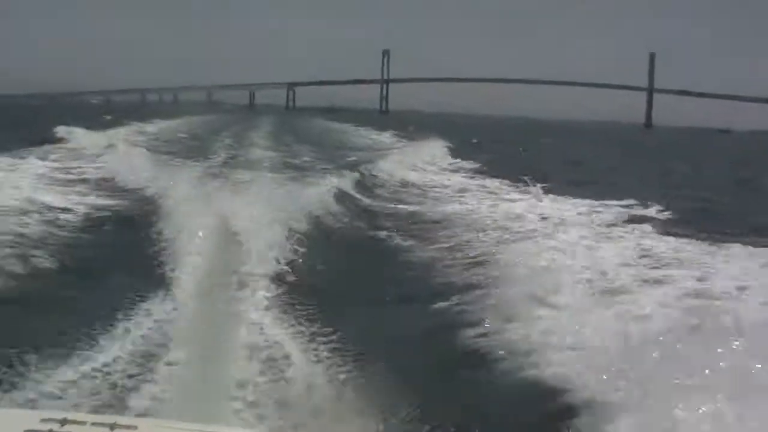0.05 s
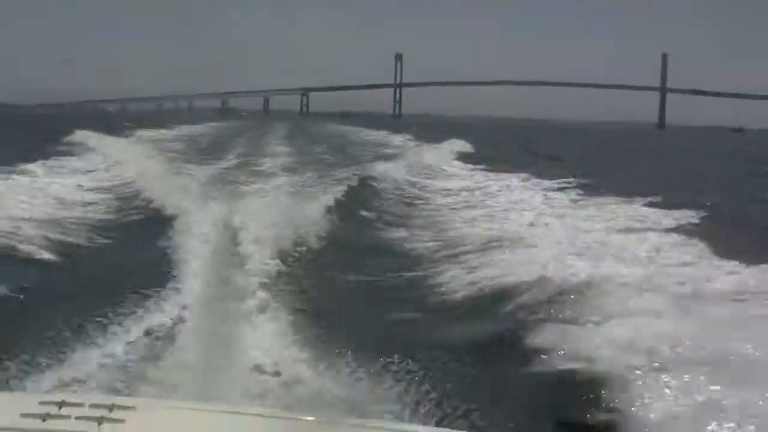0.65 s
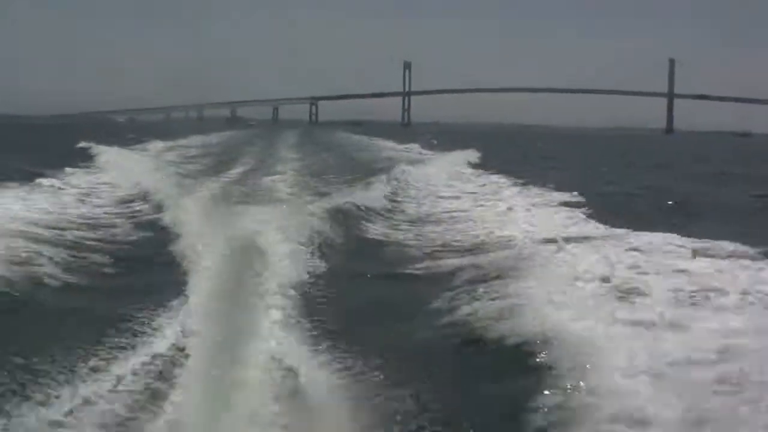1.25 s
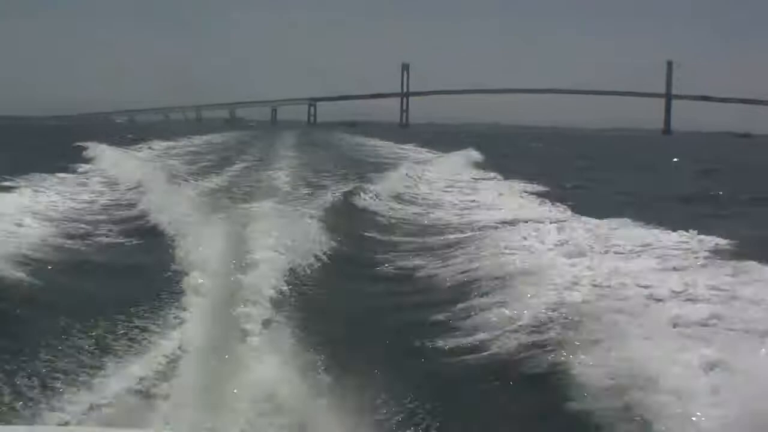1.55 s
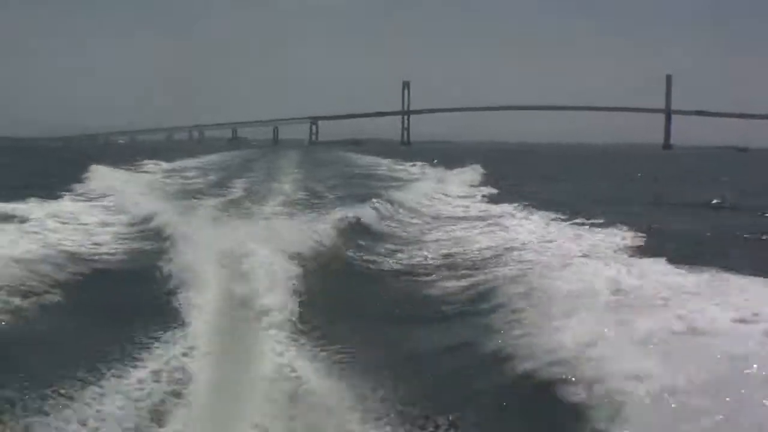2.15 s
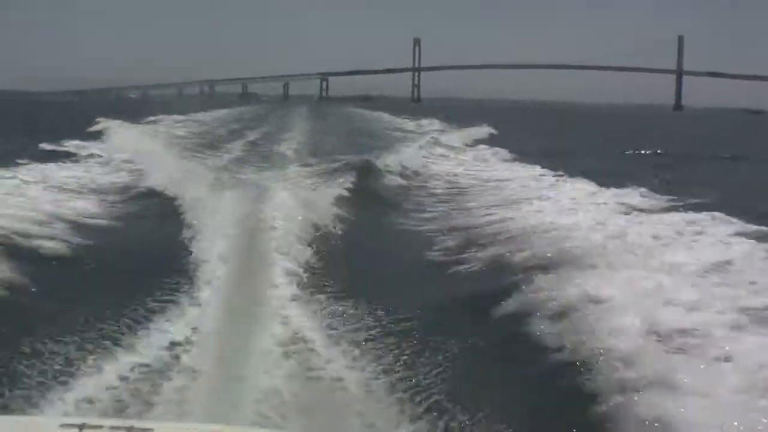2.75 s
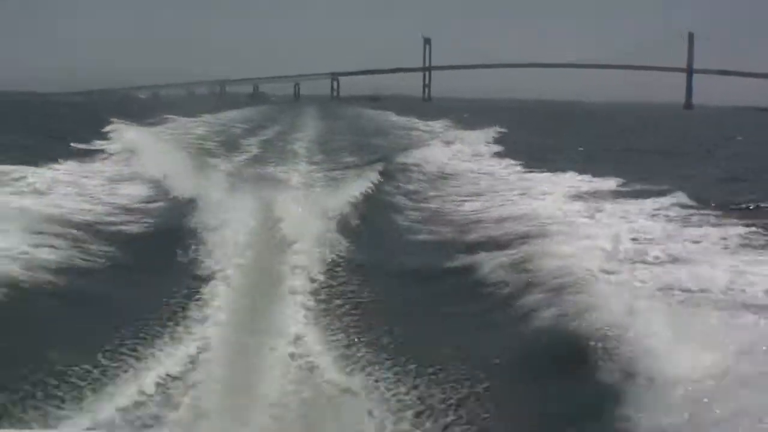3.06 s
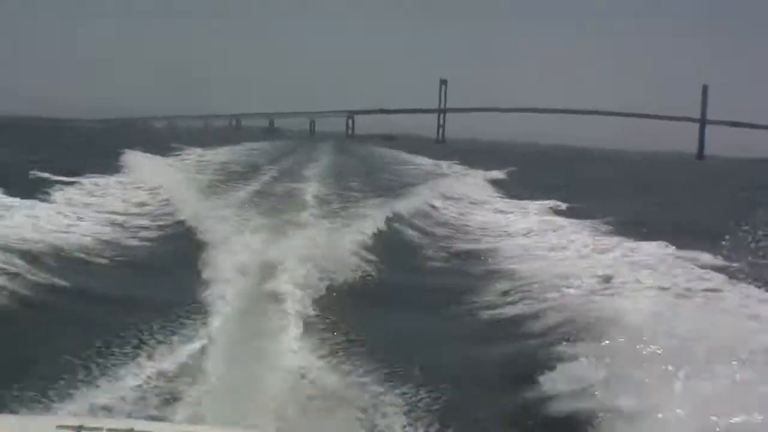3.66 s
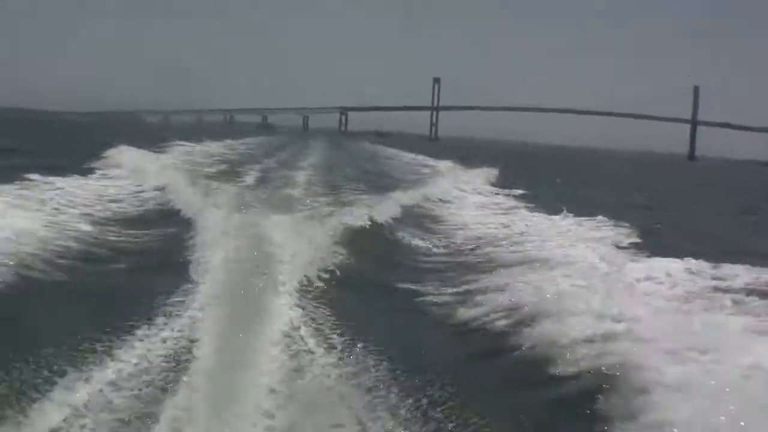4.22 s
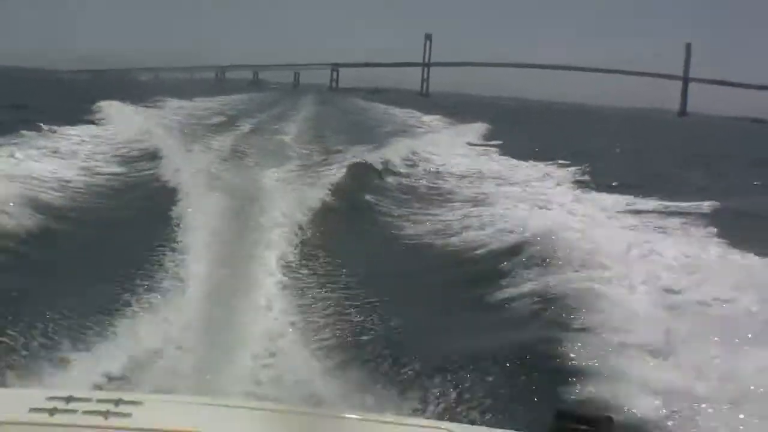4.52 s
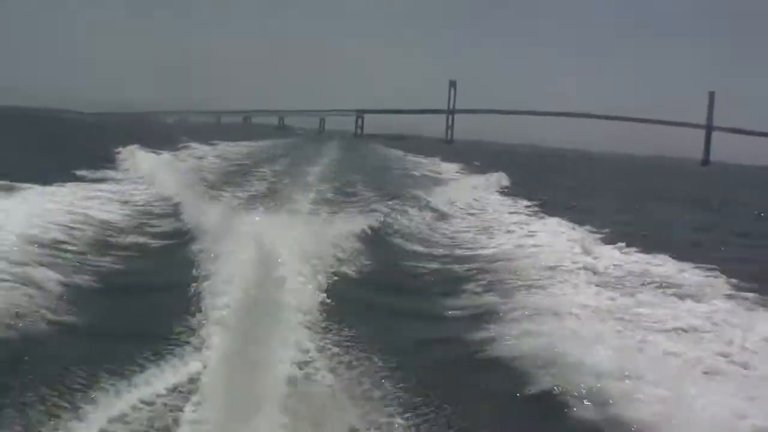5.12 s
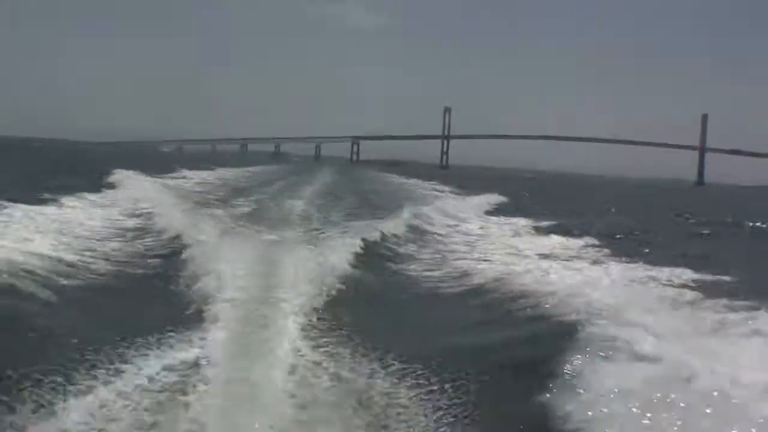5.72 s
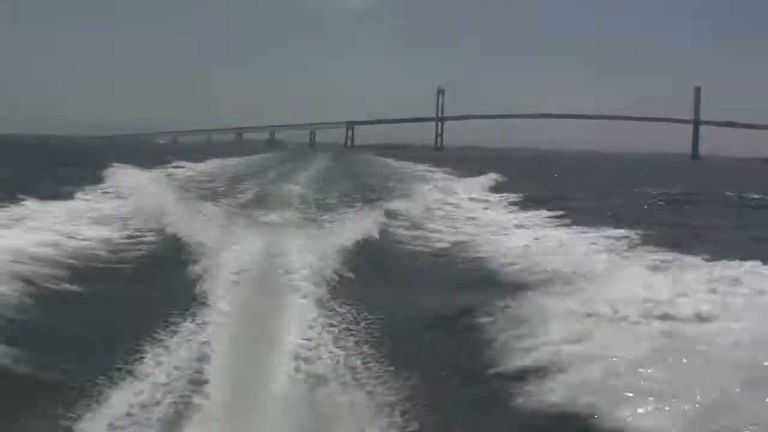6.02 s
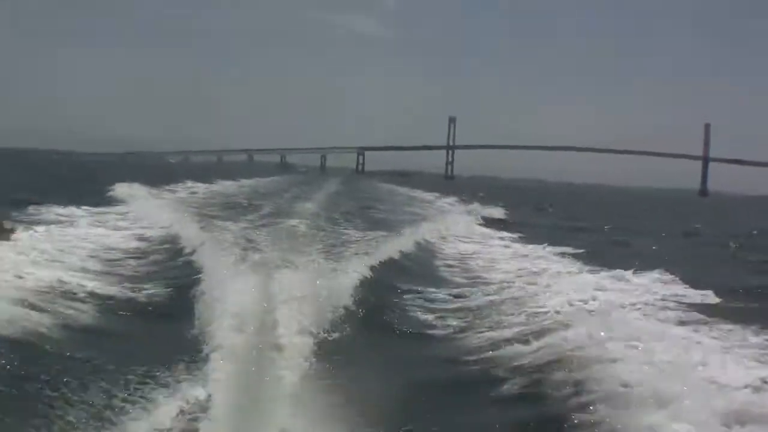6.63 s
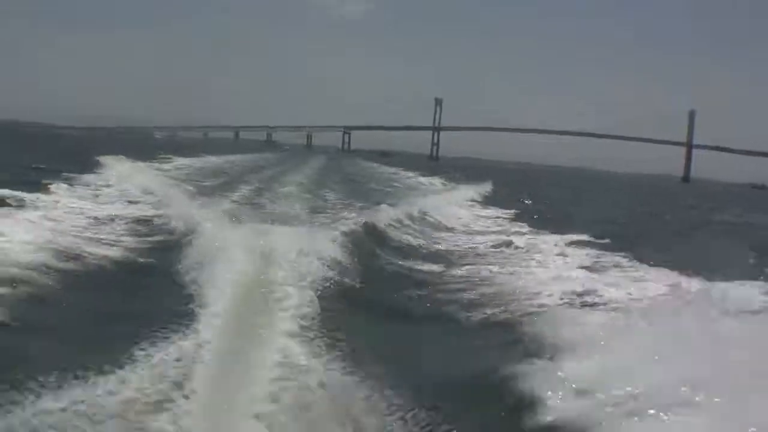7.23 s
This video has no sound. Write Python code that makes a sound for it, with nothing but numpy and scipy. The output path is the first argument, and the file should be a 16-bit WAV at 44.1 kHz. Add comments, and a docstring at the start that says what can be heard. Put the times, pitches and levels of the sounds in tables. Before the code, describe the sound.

Water rushes and sprays in surges behind a fast motorboat, its engines throbbing steadily as gusts bump the microphone.

```python
"""A twin-engine motorboat runs at speed over choppy water, heard from the stern.
From the start the two engines beat at slightly different speeds; exhaust booms and burbles through the
wake and the drives whine. About every half second a wave makes the wake rush and the spray hiss and
patter harder. Gusts buffet the microphone now and then, hardest near 4.4 s. Just after 6.2 s the
exhaust turns hoarse and stays so to the end."""
import sys
import numpy as np
from scipy import signal
from scipy.fft import rfft, irfft, next_fast_len
from scipy.io import wavfile
from scipy.ndimage import uniform_filter1d

SR = 44100
rng = np.random.default_rng(int(sys.argv[2]) if len(sys.argv) > 2 else 0)


def pcm_store(signal):
    """Save signal as 16-bit PCM."""
    levels = np.round(np.clip(np.atleast_2d(signal), -1, 1) * 32767)
    wavfile.write(sys.argv[1], SR, levels.astype(np.int16).T)


N = 325458
T = np.arange(N) / SR

# near engine's speed in four-stroke cycles; an order is a multiple of this rate: time_s, cycle_hz
ENGINE_SPEED = [(0, 32.37), (1.1, 32.44), (1.75, 32.33), (2.45, 32.4), (3.2, 32.28), (3.9, 32.39),
                (5.25, 32.28), (5.9, 32.51), (6.7, 32.34), (7.38, 32.43)]
# exhaust boom, swelling as the stern settles: time_s, level_db
BOOM_LEVEL = [(0.05, -15), (0.19, -13), (1.36, -15), (1.42, -11), (2.03, -15.5), (2.25, -12.5),
              (2.59, -15.5), (3.3, -12), (4.17, -14.5), (4.31, -10.5), (4.65, -14.5), (5.4, -11.5),
              (5.6, -17.5), (5.74, -14.5), (6.53, -14), (6.71, -11.5), (7.22, -16.5), (7.3, -13)]
# exhaust throb, under its quick beating: time_s, level_db
THROB_LEVEL = [(0.55, -22.5), (1.05, -19), (2.6, -20.5), (3.55, -23), (4.0, -21), (5.3, -24), (6.0, -18.5),
               (6.7, -23.5), (7.2, -20)]
# partials of the exhaust's rasp: order, relative_db
RASP_PARTIALS = [(10, -34), (11, -39), (12, -37.5), (13, -46), (14, -38.5), (16, -41), (17, -48.5),
                 (18, -42), (19, -43), (20, -42.5), (21, -51), (22, -45), (25, -51.5)]
# slow rise and fall of the rasp, under the waves: time_s, gain_db
RASP_RIDE = [(0.2, 0.5), (0.6, -1.5), (2.6, -3), (3.25, 0.5), (3.85, -5.5), (4.5, -5), (5.2, -0.5),
             (5.8, -2.5), (7.38, -1)]
# the near engine's hum: order, level_db
NEAR_PARTIALS = [(3, -32.5), (4, -34), (6, -29), (9, -38), (24, -46), (26, -46), (27, -44.5), (30, -51.5),
                 (32, -50.5), (46, -53.5), (50, -49), (52, -58), (74, -57), (78, -58), (80, -64),
                 (84, -52.5), (86, -62), (88, -54.5), (90, -58.5), (92, -51.5)]
# tone of exhaust gas breaking up under water: frequency_hz, gain_db
BURBLE_EQ = [(25, -27), (60, 2.5), (100, -3.5), (170, 2), (230, -4.5), (300, -7.5), (420, -22),
             (800, -34.5), (3000, -62)]
# near drive's lower whine: time_s, level_db
LOW_WHINE_LEVEL = [(0.1, -48.5), (0.14, -45), (2.48, -51), (4.91, -44), (5.49, -55), (5.89, -48),
                   (7.2, -59), (7.3, -60)]
# near drive's upper whine, under its flutter: time_s, level_db
HIGH_WHINE_LEVEL = [(0, -49), (1.3, -43.5), (2.5, -48), (2.75, -40.5), (3.6, -44), (4.0, -41),
                    (4.65, -46.5), (5.25, -44), (6.55, -40.5), (7.38, -47)]
# the far engine's low notes: order, level_db
FAR_PARTIALS = [(3, -26.5), (5, -35.5), (6, -29), (8, -42.5), (9, -39.5)]
# far drive's whine: time_s, level_db
FAR_WHINE_LEVEL = [(0.1, -41), (0.5, -44), (0.84, -40.5), (2.59, -42.5), (2.77, -36.5), (3.67, -52),
                   (5.07, -38.5), (5.39, -44.5), (6.34, -39.5), (6.66, -47), (7.3, -42)]
# surges of white water as the hull meets each wave: peak_s, length_s, boost_db
WAVE_SURGES = [(0.3, 0.45, 1.5), (0.8, 0.36, 2.5), (1.26, 0.3, 2.5), (1.75, 0.16, 1.5), (1.99, 0.42, 3),
               (2.36, 0.21, 3.5), (2.75, 0.33, 4), (3.33, 0.63, 1.2), (3.89, 0.29, 3), (4.33, 0.53, 2),
               (4.89, 0.33, 3.8), (5.27, 0.25, 2.5), (5.84, 0.34, 3.0), (6.41, 0.61, 3.5), (7.36, 0.31, 3)]
# tone of the rushing wake: frequency_hz, gain_db
WAKE_EQ = [(100, -1), (350, 0.5), (480, 1), (750, -1), (950, -0.5), (1250, -5), (1600, -4.5), (1900, -7),
           (3000, -9.5), (4000, -13.5), (5500, -25), (9000, -27.5), (15000, -40)]
# tone of the falling spray: frequency_hz, gain_db
SPRAY_EQ = [(1500, -71), (3200, -4.5), (4700, 0.5), (7000, -1), (9500, 0), (11500, 0.5), (13000, 0.5),
            (14300, -3.5)]
# how alike the hiss is in left and right: frequency_hz, correlation
SPRAY_LIKENESS = [(3000, 0.61), (6600, 0.38), (14400, 0.46)]
# phase of the hiss between the sides: frequency_hz, left_lead_rad
SPRAY_LEAD = [(3000, 0), (9000, 0.25), (10800, -0.2), (12800, -3), (14600, -2.5)]
# gusts on the microphone, above the steady wind: peak_s, length_s, boost_db
WIND_GUSTS = [(.55, .3, 11), (1.95, .5, 6), (3.45, 0.38, 6), (4.38, .3, 12), (6.82, .4, 9)]
# tone of the wind's rumble: frequency_hz, gain_db
WIND_EQ = [(5, -18), (18, 1), (32, 2), (50, -6), (250, -35), (1000, -73)]
# balance of the two microphone ports: frequency_hz, left_minus_right_db
PORT_BALANCE = [(65, 3.1), (110, 2.2), (200, .6), (690, 0), (4300, -.1), (7900, .6), (14400, 2.2)]


def exhaust(cycles, surge_db, sunk_db, boom_trim_db=-0.04, drone_db=-18.5, duck=0.22, follow=0.39):
    """The firings set off three clean notes: a boom, a beating throb and a drone that the boom ducks."""
    boom = partial(2 * cycles, waver=0.06, waver_hz=7, locked=True)
    beat = beating(rate_hz=1.968, crest_s=0.479, depth=0.32)
    throb = partial(5 * cycles, waver=0.16, waver_hz=4, beat=beat, locked=True)
    drone = partial(7 * cycles, waver=0.1, waver_hz=5, locked=True)
    return (gain_of(envelope(BOOM_LEVEL) + boom_trim_db) * boom
            + gain_of(envelope(THROB_LEVEL)) * throb
            + gain_of(drone_db - duck * sunk_db + follow * surge_db) * drone)


def growl(cycles, surge_db, note_db=-37, hoarse_at_s=6.23, rise_s=0.37, hoarse_db=13, follow=0.89,
          bite_db=5.0, bite_hz=680, bite_width_hz=105):
    """A low note under a rasp that opens with each wave; both grow when the exhaust turns hoarse."""
    hoarse = np.clip((T - hoarse_at_s) / rise_s, 0, 1)
    sound = gain_of(note_db + hoarse_db * hoarse) * partial(8 * cycles, waver=0.22, waver_hz=3.6)
    open_db = envelope(RASP_RIDE) + follow * surge_db
    for order, relative_db in RASP_PARTIALS:
        pitch_hz = order * cycles[-1] / T[-1]
        lift_db = bite_db * np.exp(-((pitch_hz - bite_hz) / bite_width_hz) ** 2)
        rasp = partial(order * cycles, waver=0.56, waver_hz=3.6)
        sound += gain_of(relative_db + open_db + lift_db * hoarse) * rasp
    return sound


def engine_hum(cycles, partials, waver, waver_hz):
    """Harmonics of an engine's cycle, each wavering on its own."""
    return sum(gain_of(db) * partial(order * cycles, waver, waver_hz) for order, db in partials)


def burble(cycles, sunk_db, level_db=-24.0, follow=0.35, churn_db=0.8):
    """Exhaust gas breaks up under water, louder as the stern settles."""
    # a puff at each turn of the crank, every second one stronger
    puffs = 1 + 0.3 * np.cos(2 * np.pi * 2 * cycles) + 0.3 * np.cos(2 * np.pi * cycles)
    ride_db = level_db + follow * sunk_db + churn_db * drift(rate_hz=4).real
    return gain_of(ride_db) * shaped(puffs * rng.standard_normal(N), BURBLE_EQ)


def drive_whine(cycles, gear_order=28.69, gear_db=-48):
    """Two whines locked to the crank, the upper one fluttering, and one from a geared shaft."""
    low = partial(44 * cycles, waver=0.61, waver_hz=5)
    flutter = beating(rate_hz=5.634, crest_s=0.05, depth=0.43)
    high = partial(48 * cycles, waver=0.45, waver_hz=9.3, beat=flutter)
    gear = partial(gear_order * cycles, waver=0.81, waver_hz=2)
    return (gain_of(envelope(LOW_WHINE_LEVEL)) * low
            + gain_of(envelope(HIGH_WHINE_LEVEL)) * high
            + gain_of(gear_db) * gear)


def far_engine(cycles):
    """The second engine: a few low notes that beat with the near one, and its own whine."""
    whine = gain_of(envelope(FAR_WHINE_LEVEL)) * partial(30 * cycles, waver=0.25, waver_hz=4.3)
    return engine_hum(cycles, FAR_PARTIALS, waver=0.3, waver_hz=2) + whine


def wake(cycles, surge_db, lull_db=-33.5, chop_depth=0.082):
    """Rushing white water that surges with each wave, lightly chopped by the exhaust pulses."""
    (water, _), _ = foam(patch_db=0.8)
    chop = 1 + chop_depth * np.cos(2 * np.pi * 2 * cycles)
    return gain_of(lull_db + surge_db) * shaped(to_samples(water) * chop, WAKE_EQ)


def spray(surge_db, lull_db=-40, follow=1.09, drops_db=-14, drops_per_s=4000):
    """Falling spray: a wide hiss with single drops pattering in it, swelling with each wave."""
    (left, unrelated), hz = foam(patch_db=0.86)
    likeness = at_hz(SPRAY_LIKENESS, hz)
    right = likeness * left + np.sqrt(1 - likeness ** 2) * unrelated
    right *= np.exp(-1j * at_hz(SPRAY_LEAD, hz))
    hiss = unit_rms(to_samples(np.array([left, right])))
    drop_sizes = rng.standard_normal((2, N))
    drops = unit_rms(drop_sizes * (rng.random((2, N)) < drops_per_s / SR))
    return gain_of(lull_db + follow * surge_db) * shaped(hiss + gain_of(drops_db) * drops, SPRAY_EQ)


def foam(patch_db, size=512):
    """Foam texture: two short-time noise spectra sharing loud and soft patches, and their Hz axis."""
    shape = (N // (size // 4) + 5, size // 2 + 1)
    a, b, c, d, patches = rng.standard_normal((5,) + shape)
    patches = uniform_filter1d(patches, size=22, axis=0)  # smear in time
    patches = unit_rms(uniform_filter1d(patches, size=9, axis=1))  # and in frequency
    spectra = np.array([a + 1j * b, c + 1j * d]) * gain_of(patch_db * patches)
    return spectra, np.fft.rfftfreq(size, 1 / SR)


def wind(steady_db=-40.5):
    """Low buffets of air on the microphone."""
    return gain_of(steady_db + swells_db(WIND_GUSTS)) * shaped(rng.standard_normal(N), WIND_EQ)


def partial(turns, waver, waver_hz, beat=1, locked=False, spread_s=3e-5):
    """One stereo engine tone, partly scattered by moving water; if locked, in phase with the firings."""
    mean_hz = turns[-1] / T[-1]
    lead_turns = np.array([[spread_s], [-spread_s]]) * rng.uniform(-0.69, 1) * mean_hz
    start_turns = rng.random() * (not locked)
    scatter = 1 + waver * drift(waver_hz)
    tone = beat * scatter * np.exp(2j * np.pi * (turns + start_turns + lead_turns))
    return unit_rms(tone.imag)


def beating(rate_hz, crest_s, depth):
    """Complex gain of a note that beats against a weaker neighbour."""
    return unit_rms(1 + depth * np.exp(2j * np.pi * rate_hz * (T - crest_s)))


def drift(rate_hz, count=2048):
    """Slow complex random wobble of rms 1 that rolls off above rate_hz."""
    hz = np.fft.fftfreq(count, T[-1] / count)
    noise = rng.standard_normal(count) + 1j * rng.standard_normal(count)
    slow = np.fft.ifft(np.fft.fft(noise) / (1 + (hz / rate_hz) ** 2))
    return np.interp(T, np.linspace(0, T[-1], count), unit_rms(slow))


def swells_db(events):
    """Summed boost of events that each rise and fall in a bell curve."""
    return sum(db * np.exp(-(2 * (T - peak_s) / length_s) ** 2) for peak_s, length_s, db in events)


def envelope(table):
    """A time table joined by straight ramps, at every sample."""
    return np.interp(T, *np.transpose(table))


def at_hz(table, hz):
    """A frequency table read along a log axis."""
    points_hz, values = np.transpose(table)
    return np.interp(np.log(hz + 1), np.log(points_hz + 1), values)


def shaped(x, eq):
    """Applies an EQ curve and scales to rms 1."""
    size = next_fast_len(N)
    gain = gain_of(at_hz(eq, np.fft.rfftfreq(size, 1 / SR)))
    return unit_rms(irfft(rfft(x, size) * gain, size)[..., :N])


def to_samples(spectra, size=512):
    """Overlaps short-time spectra into a waveform."""
    return signal.istft(np.swapaxes(spectra, -1, -2), nperseg=size, noverlap=size * 3 // 4)[1][..., :N]


def gain_of(db):
    """Decibels to amplitude."""
    return 10 ** (np.asarray(db) / 20)


def unit_rms(x):
    """Scales to rms 1."""
    return x / np.sqrt(np.mean(abs(x) ** 2) + 1e-20)


def scene(far_speed_ratio=1.0205, slosh_db=0.6, slosh_hz=11):
    """The mix: both engines in front, then the water and the wind."""
    cycles = np.cumsum(envelope(ENGINE_SPEED)) / SR
    surge_db = swells_db(WAVE_SURGES)
    boom_db = envelope(BOOM_LEVEL)
    sunk_db = boom_db - boom_db.mean()  # extra boom as the stern settles
    near = exhaust(cycles, surge_db, sunk_db) + growl(cycles, surge_db)
    near += engine_hum(cycles, NEAR_PARTIALS, waver=0.69, waver_hz=3.0)
    near += drive_whine(cycles) + burble(cycles, sunk_db)
    slosh = gain_of(slosh_db * drift(slosh_hz).real)  # sheets of water land in quick uneven lumps
    far = far_engine(far_speed_ratio * cycles)
    water = slosh * (wake(cycles, surge_db) + spray(surge_db))
    return near + far + water + wind()


def record(dry, left_corner_hz=25, right_corner_hz=62, high_cut_hz=14350):
    """Two microphone ports, unequal in level and bass phase, then soft overload and a steep high cut."""
    size = next_fast_len(N + SR)
    hz = np.fft.rfftfreq(size, 1 / SR)
    skew_rad = np.arctan2(hz, left_corner_hz) - np.arctan2(hz, right_corner_hz)
    left_port = gain_of(at_hz(PORT_BALANCE, hz) / 2) * np.exp(-1j * skew_rad / 2)
    heard = irfft(rfft(dry, size) * np.array([left_port, 1 / left_port]), size)[:, :N]
    limited = heard / (1 + heard ** 8) ** (1 / 8)
    high_cut = signal.firwin(511, high_cut_hz, window=("kaiser", 9), fs=SR)
    return signal.oaconvolve(limited, high_cut[None], "same")


dry = scene()
out = record(dry)
pcm_store(out)
```